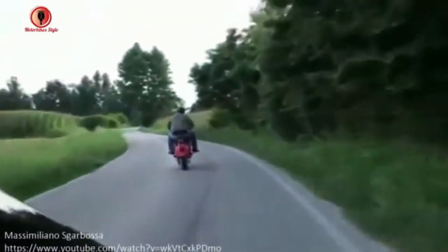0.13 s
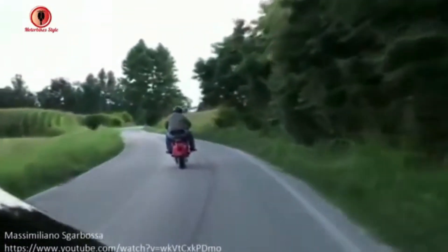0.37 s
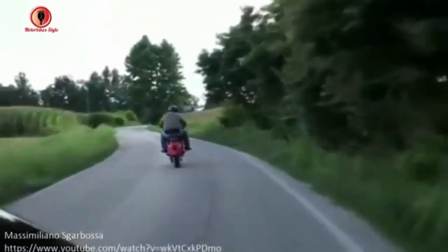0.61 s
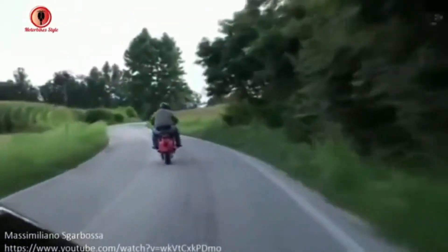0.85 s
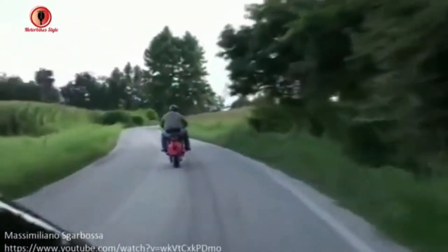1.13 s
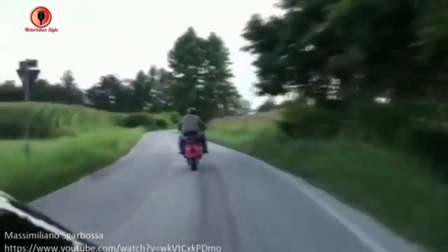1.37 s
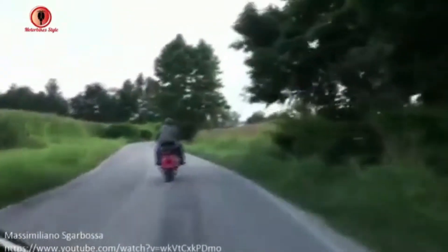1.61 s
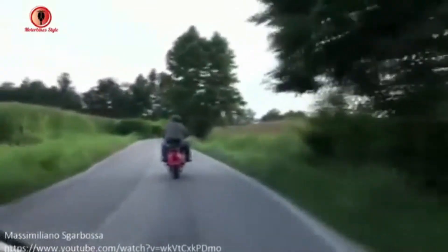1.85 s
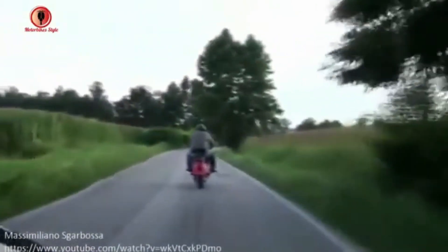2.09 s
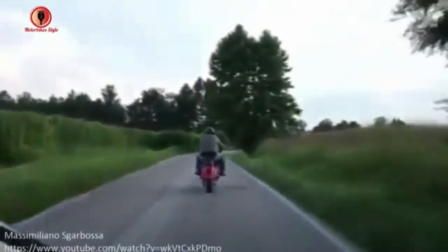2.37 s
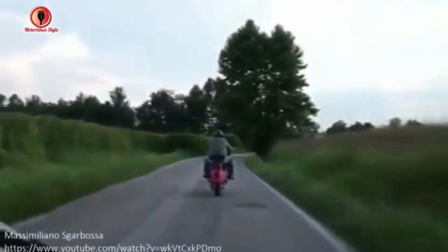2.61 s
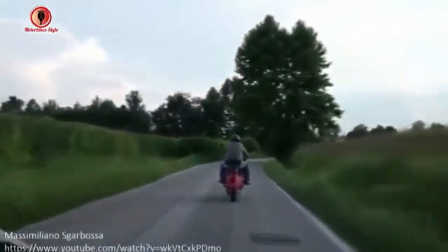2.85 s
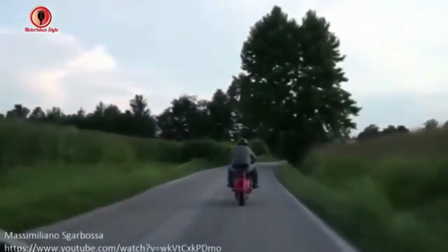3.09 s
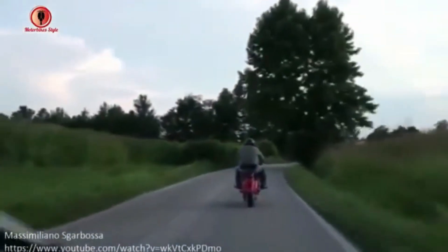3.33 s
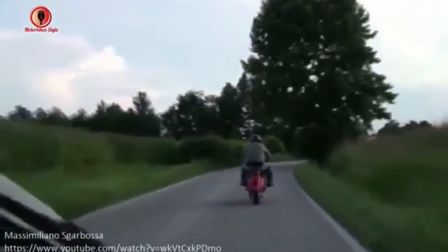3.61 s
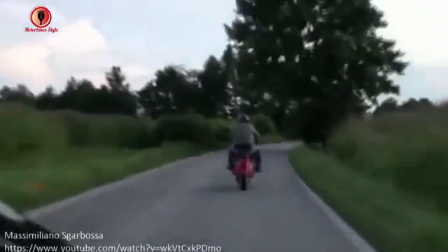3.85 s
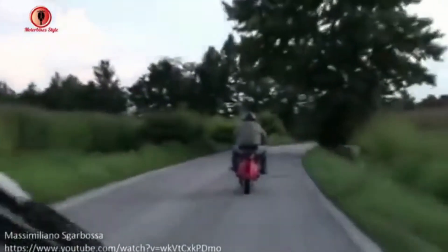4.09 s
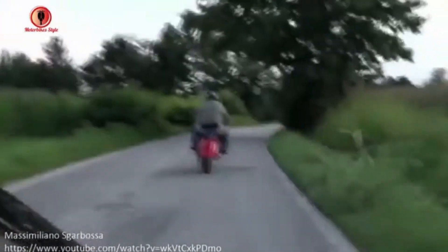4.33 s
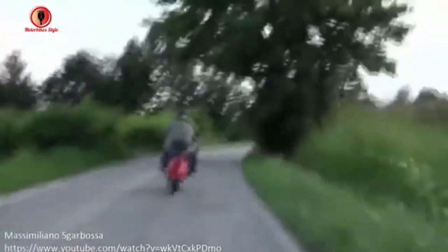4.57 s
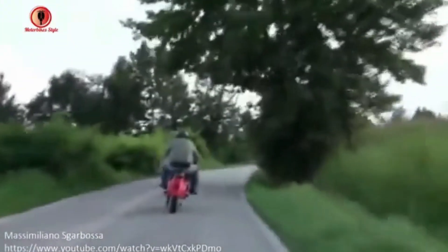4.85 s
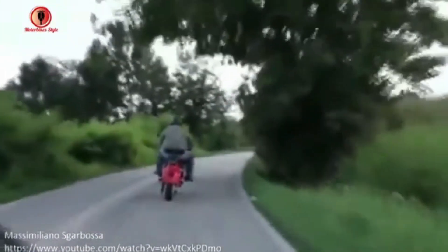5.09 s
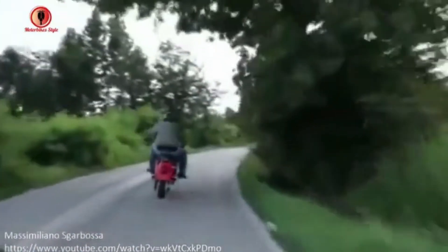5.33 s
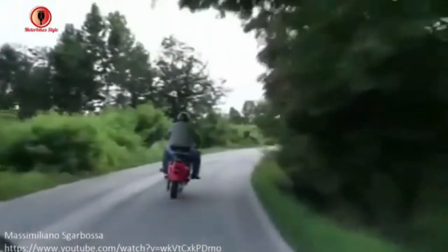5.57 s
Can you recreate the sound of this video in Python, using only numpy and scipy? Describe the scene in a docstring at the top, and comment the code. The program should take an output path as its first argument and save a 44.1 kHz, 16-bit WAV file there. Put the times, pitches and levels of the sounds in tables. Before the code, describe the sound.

Lumpy, distorted wind rumble dominates over road hiss and sizzling metal ticks while a distant scooter drops in pitch, then slowly climbs.

```python
"""Wind buffets a stereo microphone at the open window of a car: low noise in lumps, driven into soft clipping.
Tyres and air hiss, noise bands that rise past hedges; a metal part sizzles and ticks, struck resonances.
Faintly ahead drones a scooter, harmonics and noise puffs at its firing rate:
it drops as a gear is changed, then climbs."""
import sys
import numpy as np
from scipy import signal
from scipy.fft import rfft, irfft, next_fast_len
from scipy.io import wavfile
from scipy.ndimage import uniform_filter1d, map_coordinates

SR = 44100
rng = np.random.default_rng(int(sys.argv[2]) if len(sys.argv) > 2 else 0)


def natural_amplitude(level_db):
    """Convert a level in decibels to a linear amplitude factor, elementwise."""
    exponent = np.asarray(level_db, float) / 20
    return 10 ** exponent


def waveform_to_disk(signal):
    """Save audio, clipped to [-1, 1], as 16-bit WAV at the path in sys.argv[1]."""
    frames = np.transpose(np.atleast_2d(signal))
    scaled = np.clip(frames, -1, 1) * 32767
    samples = np.round(scaled).astype(np.int16)
    wavfile.write(sys.argv[1], SR, samples)


N = 251370

# how hard airflow and bumps shake the metal part: time_s, lift_db
SHAKE_LIFT = [(0, -1), (.12, 9.5), (.25, 8.5), (.45, 5.5), (.65, 4), (.85, 3.5), (1.2, 0.5), (1.35, 4),
              (1.6, 1.5), (1.9, 1.5), (2.1, 0.5), (3.0, 4), (3.35, 1.5), (3.65, 5), (4.1, 4), (4.3, 5),
              (4.55, 5.5), (4.85, 2.5), (5.0, 1.5), (5.7, 1.5)]


def unit(x):
    """Scaled to rms 1."""
    return x / np.sqrt(np.mean(x ** 2) + 1e-20)


def along(points, hz):
    """(Hz, value) points interpolated on a log frequency axis."""
    point_hz, value = np.transpose(points)
    return np.interp(np.log(hz + 1), np.log(point_hz + 1), value)


def curves(rows):
    """One value per sample for each column after the time."""
    time_s, *columns = np.transpose(rows)
    return [np.interp(np.arange(N) / SR, time_s, c) for c in columns]


def wobble(rate_hz):
    """A smooth random curve with rate_hz knots a second."""
    knots = rng.standard_normal(int(N * rate_hz / SR) + 4)
    return map_coordinates(knots, [np.arange(N) * rate_hz / SR])


def filtered(x, response):
    """x times a complex response of frequency."""
    m = next_fast_len(N + 8192)
    return irfft(rfft(x, m) * response(np.fft.rfftfreq(m, 1 / SR)), m)[..., :N]


def rush(spectrum, patchy_db):
    """Stereo turbulence: noise of mid rms 1, with time-frequency patches of random gain."""
    # left-right likeness: freq_hz, correlation
    likeness = [(25, 1), (60, 0.51), (130, 0.63), (290, 0.15), (640, 0.6), (1410, 0.7), (3100, 0.53),
                (3700, 0.16), (4200, 0.91)]
    # left-right balance: freq_hz, left_over_right_db
    balance = [(60, -2), (180, -7), (550, 0), (1650, -1), (4970, 0), (15000, 1)]
    z = signal.stft(rng.standard_normal((2, N + 512)), nperseg=512)[2]
    field = uniform_filter1d(rng.standard_normal(z.shape[1:]), size=6, axis=0)
    field = uniform_filter1d(field, size=8, axis=1)
    pair = signal.istft(z * natural_amplitude(patchy_db * unit(field)), nperseg=512)[1][:, :N]

    def mid_side(hz):
        angle = np.arccos(np.clip(along(likeness, hz), 0, 1)) / 2
        return natural_amplitude(along(spectrum, hz)) * [np.cos(angle), np.sin(angle)]

    def left_right(hz):
        return natural_amplitude(along(balance, hz) * np.array([[.5], [-.5]]))

    mid, side = filtered(pair, mid_side)
    both = filtered(np.array([mid + side, mid - side]), left_right)
    return both / np.std(both.mean(axis=0))


def dip_db():
    """How far the level dips at each moment: brief, falling and returning as Gaussian flanks."""
    # brief dips in level, deepest at 1.92 s; the road noise dips slightly too: time_s, depth_db
    dips = [(0.43, 4), (1.17, 5.5), (1.924, 16.5), (2.13, 2.5), (2.48, 6), (3.86, 3), (4.03, 5), (4.41, 4),
            (5.24, 0.5)]
    sag_s, return_s = 0.028, 0.022
    t = np.arange(N) / SR
    return sum(depth_db * np.exp(-.5 * ((t - s) / np.where(t < s, sag_s, return_s)) ** 2)
               for s, depth_db in dips)


def surge_db():
    """How far the airflow has swelled at each moment."""
    # peaks of the airflow: time_s, lift_db
    surges = [(0.17, 2.5), (0.7, 0.5), (1.23, 2.5), (2.2, 1), (2.53, 2), (2.86, 0), (3.18, 0.5), (3.7, 3),
              (3.94, 0.5), (4.62, 2), (4.97, 3), (5.47, 2)]
    half_width_s = 0.038
    t = np.arange(N) / SR
    return sum(lift_db * np.exp(-.5 * ((t - s) / half_width_s) ** 2) for s, lift_db in surges)


def wind():
    """Eddies thump the two ports, partly together, partly each on its own."""
    # buffeting spectrum: freq_hz, relative_density_db
    buffet_spectrum = [(2, -7), (10, 0.5), (26, -1), (40, 0), (60, -2), (140, -7.5), (210, -15), (295, -21),
                       (340, -26.5), (420, -27.5), (520, -34), (900, -85)]
    base_db, gust_db, sway_db = -11.5, 1.65, 1.5
    shared_db = 1.5 * wobble(22) + 1.5 * wobble(50)
    own_db = 0.59 * np.array([wobble(14), wobble(13)])
    air = natural_amplitude(shared_db + own_db) * rush(buffet_spectrum, patchy_db=0.4)
    sway = sway_db * wobble(16) * np.array([[.5], [-.5]])
    level_db = base_db - dip_db() + surge_db() + gust_db * wobble(18) + sway
    return natural_amplitude(level_db) * air / np.std(air.mean(axis=0))


def road():
    """Tyre roar, air hiss and the sizzle of the metal's resonances, dipping slightly when the wind does."""
    # nearness of hedges and trees that throw the road noise back: time_s, lift_db
    hedge_lift = [(0, 7), (.2, 3.5), (.45, 4.5), (.56, 0.5), (.95, 2), (1.2, 2), (1.5, 0), (2.2, 1),
                  (3.3, -0.6), (3.6, 1.1), (3.95, 3), (4.15, 2.5), (4.55, 4.5), (4.9, 2), (4.97, 0.2),
                  (5.7, 1.1)]
    # tyre roar spectrum: freq_hz, relative_density_db
    roar_spectrum = [(300, -8), (450, -9.5), (600, -5), (770, -7.5), (845, -4), (930, -8.5), (1050, -9.5),
                     (1280, -16), (1430, -11.5), (1540, -15.5), (1650, -15), (2150, -19.5), (2280, -18),
                     (2400, -19), (2900, -23), (3600, -20), (5000, -73)]
    # air hiss spectrum: freq_hz, relative_density_db
    hiss_spectrum = [(2200, -29), (3100, -13), (3700, 2), (5700, -1.5), (6640, 1), (7600, -5.5),
                     (8300, -17), (9500, -15.5), (10800, 9.5), (11800, -6.5), (12600, -13), (16000, -39)]
    # levels at zero lift, and dB gained per dB of lift
    roar_db, hiss_db, sizzle_db = -38, -45.5, -52.5
    roar_grows, hiss_grows, sizzle_grows = 1.05, 1.63, 1.55
    road_db_per_dip_db = 0.086

    hedge_db, = curves(hedge_lift)
    shake_db, = curves(SHAKE_LIFT)
    waver_db, drift_db = .6 * wobble(22), .6 * wobble(8)
    roar_level_db = roar_db + roar_grows * hedge_db + waver_db + 0.67 * wobble(60)
    roar = natural_amplitude(roar_level_db) * rush(roar_spectrum, patchy_db=1.02)
    hiss_level_db = hiss_db + hiss_grows * hedge_db + waver_db + drift_db + 0.33 * wobble(70)
    hiss = natural_amplitude(hiss_level_db) * rush(hiss_spectrum, patchy_db=3.5)
    flicker_db = waver_db + 0.5 * wobble(45) + 1.7 * wobble(160)
    sizzle = shaded(unit(filtered(rng.standard_normal(N), ring)))
    sizzle = natural_amplitude(sizzle_db + sizzle_grows * shake_db + flicker_db) * sizzle
    return natural_amplitude(-road_db_per_dip_db * dip_db()) * (roar + hiss + sizzle)


def scooter():
    """Harmonics of the firing rate through the pipe, plus a noise puff decaying after each firing."""
    # one table per gear: time_s, firing_hz, tone_gain_db, rasp_db
    gears = [
        [(0, 91.8, -29.5, -39.5), (.2, 89.9, -32, -37.5), (.3, 88.4, -37.5, -40.5), (.42, 81.2, -37, -44.5),
         (.75, 71.93, -48, -44), (.84, 68.4, -43, -38)],
        [(.97, 69.99, -36.5, -46), (1.78, 71.78, -37, -56), (3.06, 74.4, -37, -51), (3.73, 75.73, -37.5, -58.5),
         (4.1, 77.07, -40.5, -51), (4.6, 78.02, -35, -50.5), (5.0, 78.4, -38, -55), (5.7, 78.96, -35, -46)],
    ]
    # exhaust pipe and distance: freq_hz, gain_db
    pipe = [(60, 0.5), (213, 9), (232, 0.5), (285, 5), (310, 0.5), (360, -2), (390, 1), (428, -15),
            (448, -3.5), (463, 3), (475, -4), (490, -1.5), (510, -4.5), (535, -10), (560, -9), (620, -22),
            (690, -12.5), (770, -24.5), (845, -10), (900, -19.5), (1100, -23.5), (3000, -28)]
    # exhaust rasp spectrum: freq_hz, relative_density_db
    rasp_spectrum = [(500, -55), (900, 12), (1500, 0.5), (2400, 3.5), (3200, -4.5), (4500, -38)]
    t, out = np.arange(N) / SR, np.zeros(N)
    for rows in gears:
        hz, tone_db, rasp_db = curves(rows)
        since_start_s, until_end_s = t - rows[0][0] + 0.11, rows[-1][0] + 0.03 - t
        fade = np.clip(np.minimum(since_start_s, until_end_s) / 0.058, 0, 1)
        firings = np.cumsum(hz * (1 + .001 * wobble(6) + .002 * wobble(40))) / SR
        tone = np.zeros(N)
        for k in range(1, 22):
            gain_db = along(pipe, k * hz) + .7 * wobble(4) + .9 * wobble(18)
            tone += natural_amplitude(gain_db) * np.cos(2 * np.pi * (k * firings + rng.random()))
        puffs = np.exp(-3 * (firings % 1)) * rng.standard_normal(N)
        rasp = unit(filtered(puffs, lambda f: natural_amplitude(along(rasp_spectrum, f))))
        out += fade * (natural_amplitude(tone_db) * tone + natural_amplitude(rasp_db) * rasp)
    return out


def ticks():
    """Sharp blows with a short noisy scrape, into the metal's resonances."""
    # single ticks, strong and weak: time_s, relative_strength_db
    single_ticks = [(0.0812, -16), (0.098, -13.5), (0.207, -9.5), (0.224, -6), (0.2815, -10), (0.3162, -13),
                    (0.3758, -27), (0.41, -24), (0.735, -11), (0.833, -13.5), (0.912, -27), (1.05, -30),
                    (1.1119, -18), (1.671, -15), (1.9463, -12), (2.4913, -15), (2.919, -14),
                    (3.0296, -11.5), (3.2789, -17), (3.7584, -14), (3.819, -10), (3.866, -9.5),
                    (4.336, -14), (4.4736, -13), (4.4863, -7), (4.531, -12), (4.589, -7.5), (4.637, -8),
                    (4.688, -15), (4.702, -7), (4.7415, -7), (4.782, -12), (4.845, -13), (4.888, -8),
                    (4.897, -15), (4.996, -11.5)]
    # random faint ticking throughout; grows is dB per dB of lift
    ticks_per_s, faint_db, spread_db, grows = 98, -24.5, 3.5, 1
    shake_db, = curves(SHAKE_LIFT)
    chance, spread = rng.random(N), rng.standard_normal(N)
    blows = (chance < ticks_per_s / SR) * natural_amplitude(faint_db + grows * shake_db + spread_db * spread)
    for s, strength_db in single_ticks:
        blows[round(s * SR)] = natural_amplitude(strength_db)
    t = np.arange(SR // 50) / SR
    scrape_shape = (1 - np.exp(-t / 0.0004)) * natural_amplitude(-60 * t / 0.0066)
    scrape = signal.fftconvolve(blows, scrape_shape)[:N] * rng.standard_normal(N)
    return shaded(filtered(natural_amplitude(3.5) * blows + natural_amplitude(-5.5) * scrape, ring))


def ring(hz):
    """Resonances of the ticking part and microphone housing, applied twice for steep skirts."""
    # resonances: center_hz, single_pass_width_hz, double_pass_gain_db
    metal = [(4417, 710, -1.5), (4987, 670, -1), (6280, 490, -14.5)]
    once = sum(natural_amplitude(gain_db / 2) * 1j * hz * w / (c * c - hz * hz + 1j * hz * w)
               for c, w, gain_db in metal)
    return once ** 2


def shaded(whole):
    """The metal's colour drifts darker and brighter about a split frequency."""
    # colour of the metal: time_s, share_above_split (0-1)
    shade = [(0, 0.48), (.2, 0.47), (.28, 0.56), (.5, 0.53), (.73, 0.57), (1.1, 0.56), (3.6, 0.36),
             (4.3, 0.42), (4.9, 0.34), (5.7, 0.48)]
    split_hz = 4280
    share, = curves(shade)
    upper = filtered(whole, lambda hz: 1 / (1 + (split_hz / (hz + 1)) ** 20))
    return 2 * (share * upper + (1 - share) * (whole - upper))


def scene():
    """Wind and road surround the microphone; engine and ticks sit in the middle."""
    return wind() + road() + scooter() + ticks()


def band_limit(x):
    """A steep low-pass at the top of the band."""
    return signal.sosfilt(signal.butter(12, 15710, fs=SR, output="sos"), x)


def record(dry):
    """Gain control turns swells down; the input stage rounds off the peaks of the buffeting."""
    listen_s, cut_db_per_db = 0.12, 0.26  # cut applies above the mean level only
    mean_power = np.mean(dry ** 2)
    power = np.abs(uniform_filter1d(np.mean(dry ** 2, axis=0), size=round(listen_s * SR))) / mean_power
    held = dry * np.maximum(power, 1) ** (-cut_db_per_db / 2)
    hardness, ceiling = 3, .95
    clipped = held / (1 + np.abs(held / ceiling) ** hardness) ** (1 / hardness)
    return band_limit(clipped)


dry = scene()
out = record(dry)
waveform_to_disk(out)
```